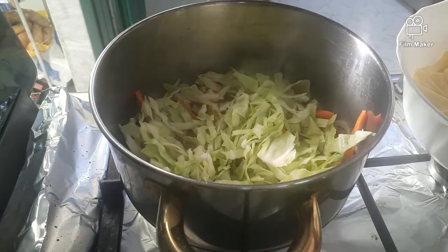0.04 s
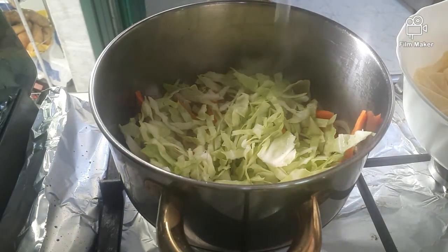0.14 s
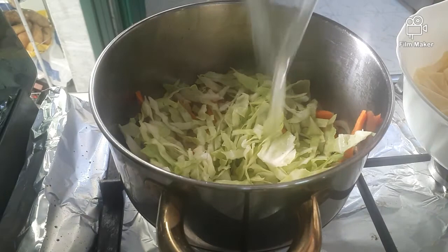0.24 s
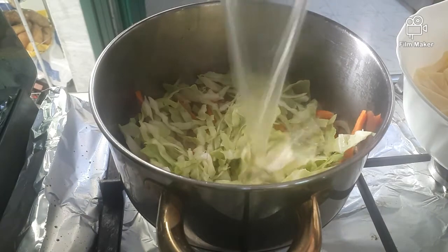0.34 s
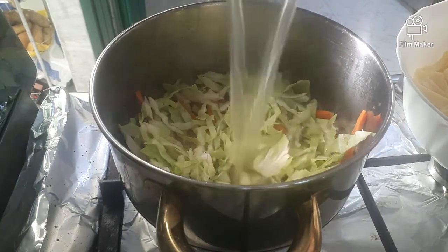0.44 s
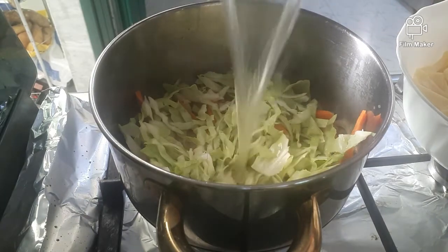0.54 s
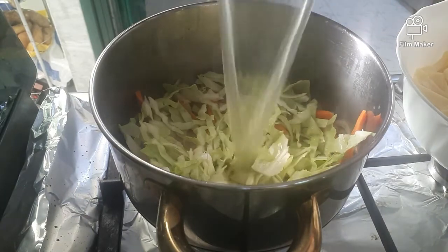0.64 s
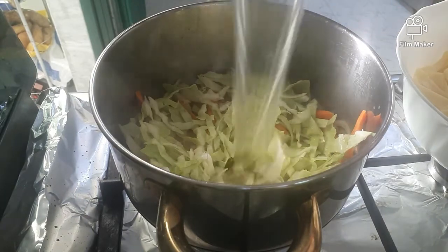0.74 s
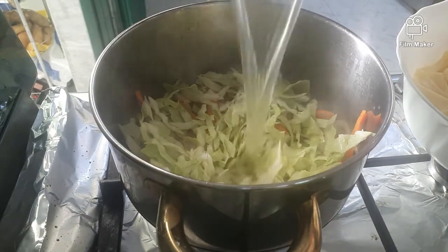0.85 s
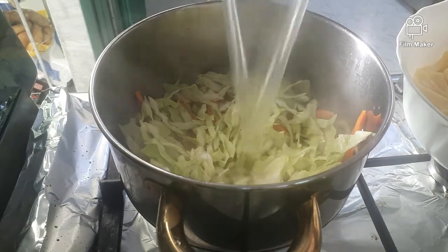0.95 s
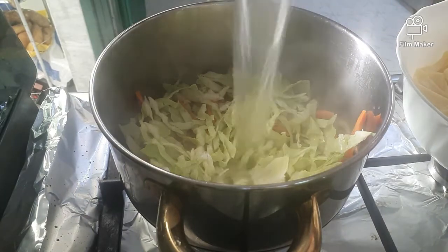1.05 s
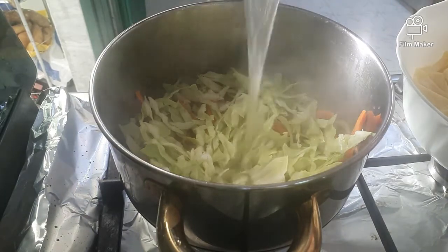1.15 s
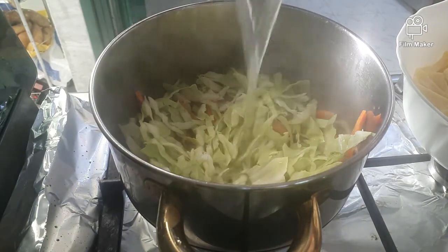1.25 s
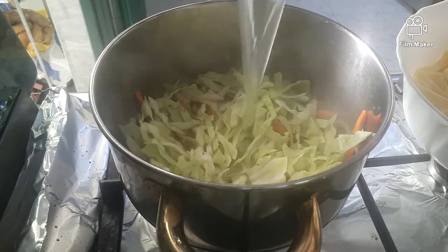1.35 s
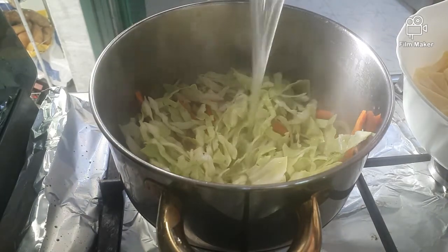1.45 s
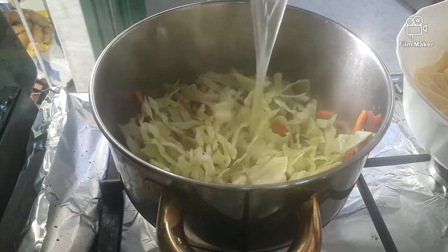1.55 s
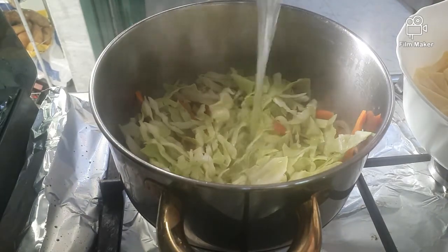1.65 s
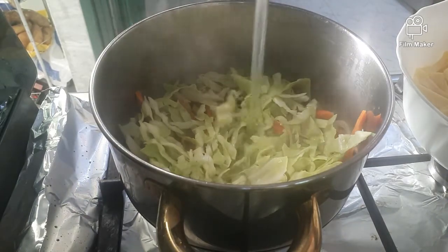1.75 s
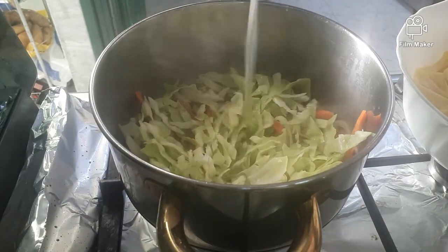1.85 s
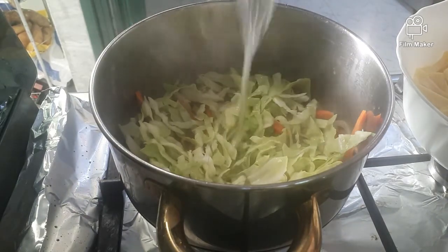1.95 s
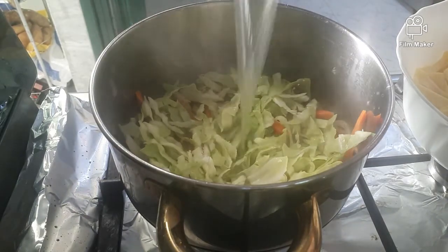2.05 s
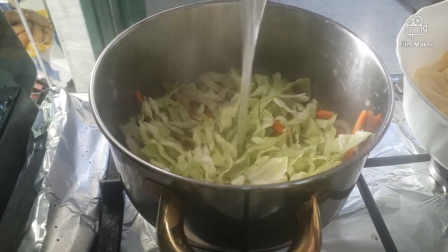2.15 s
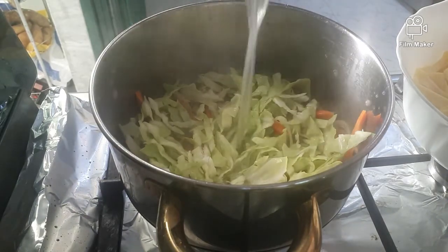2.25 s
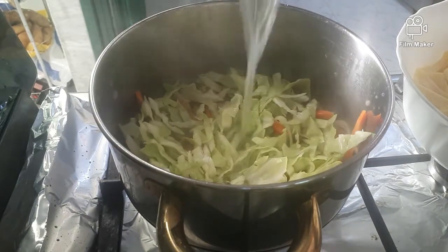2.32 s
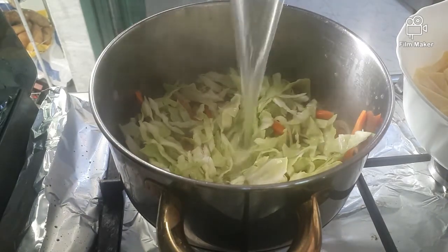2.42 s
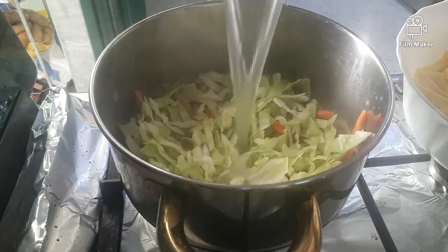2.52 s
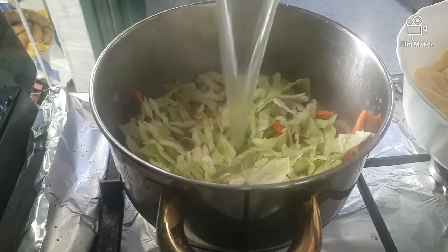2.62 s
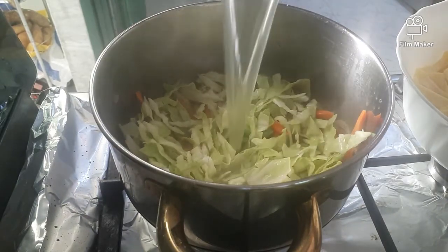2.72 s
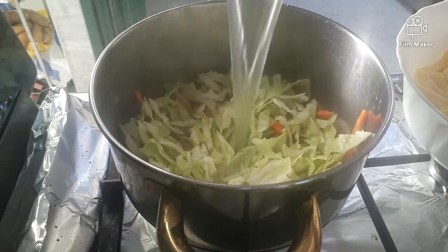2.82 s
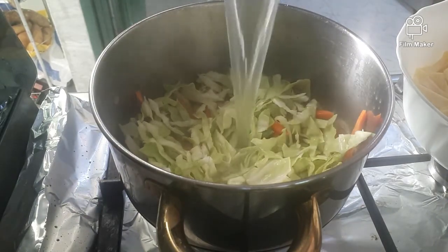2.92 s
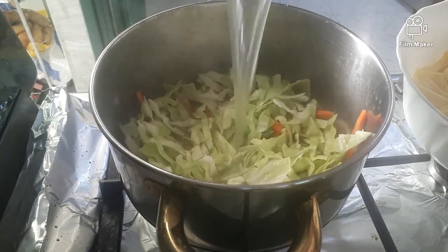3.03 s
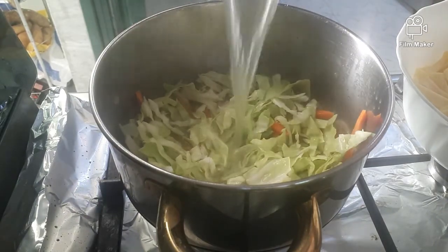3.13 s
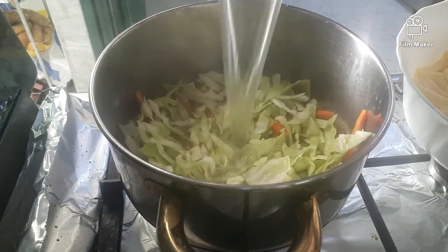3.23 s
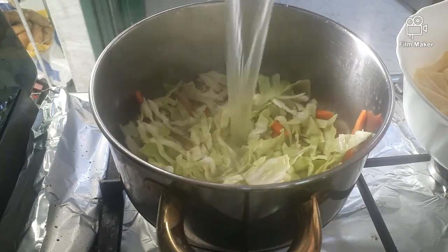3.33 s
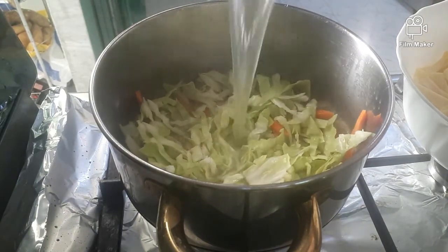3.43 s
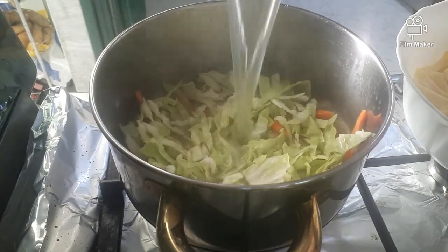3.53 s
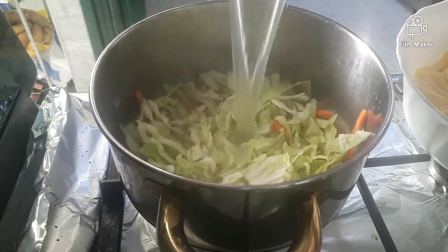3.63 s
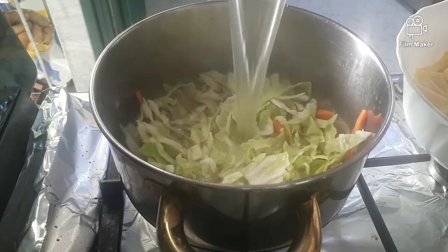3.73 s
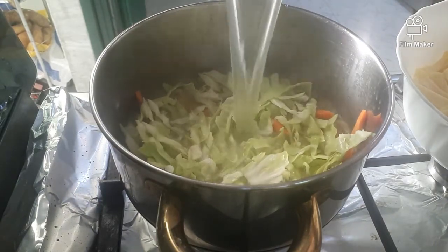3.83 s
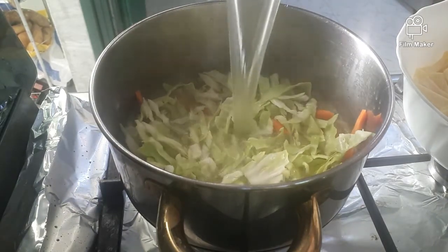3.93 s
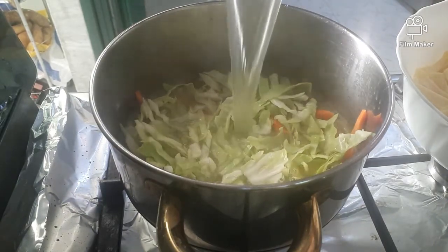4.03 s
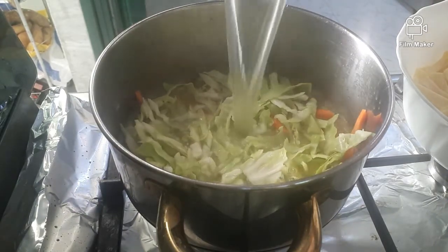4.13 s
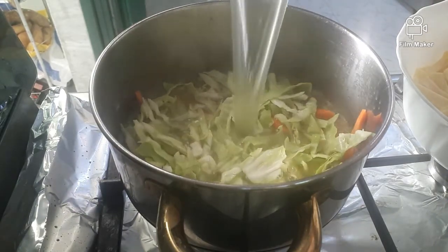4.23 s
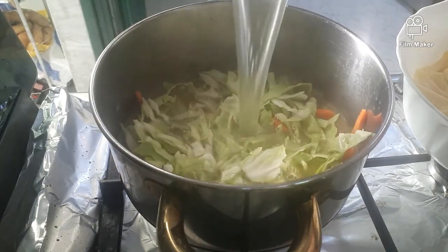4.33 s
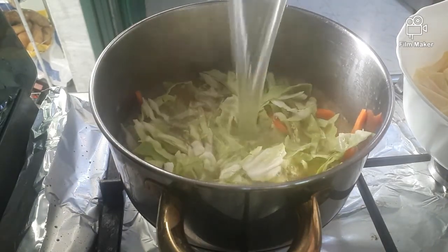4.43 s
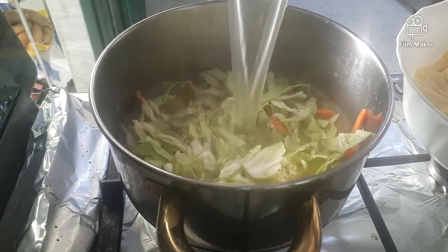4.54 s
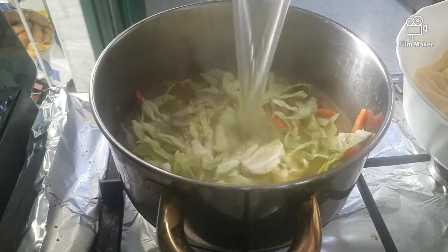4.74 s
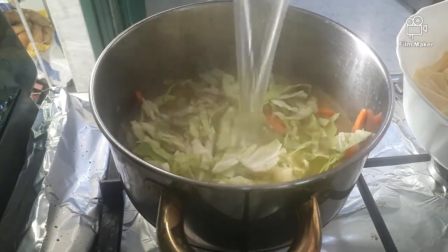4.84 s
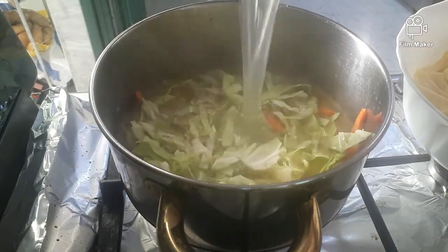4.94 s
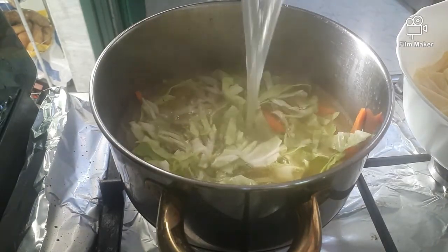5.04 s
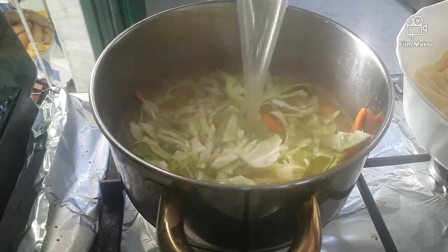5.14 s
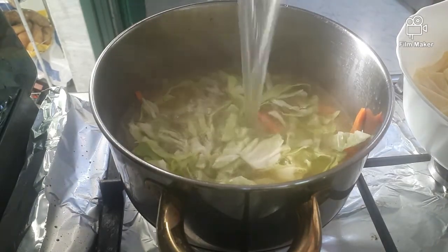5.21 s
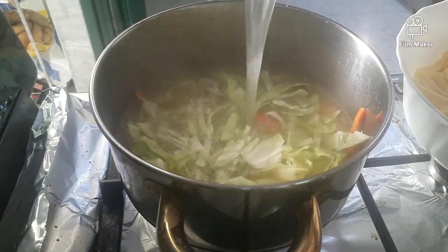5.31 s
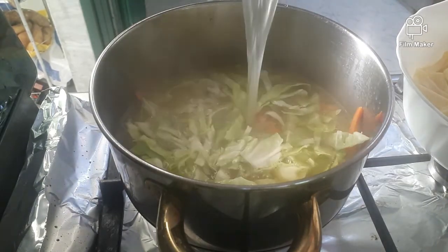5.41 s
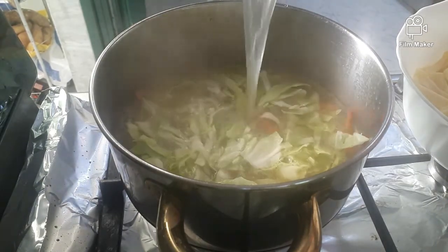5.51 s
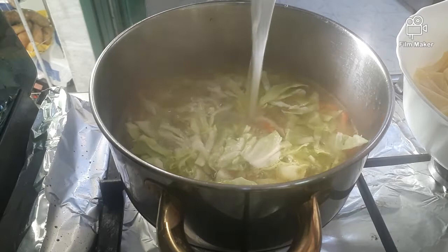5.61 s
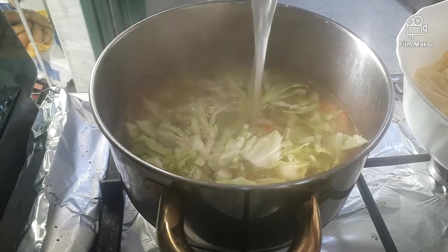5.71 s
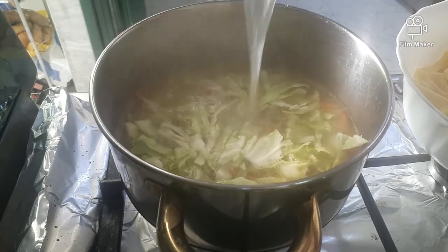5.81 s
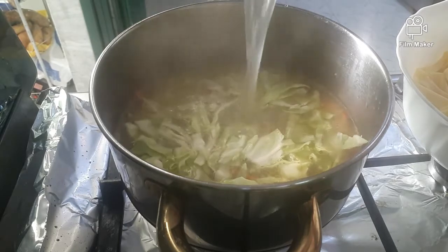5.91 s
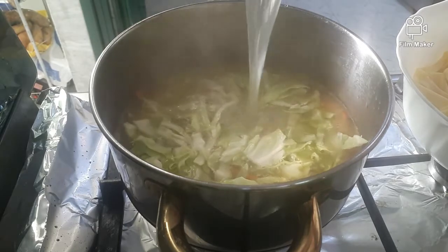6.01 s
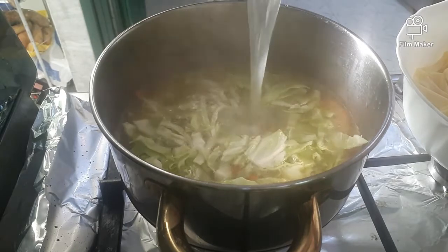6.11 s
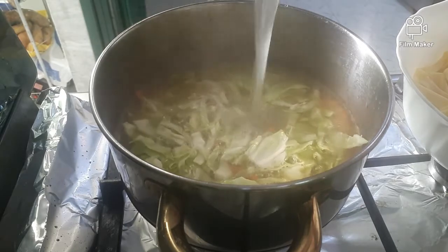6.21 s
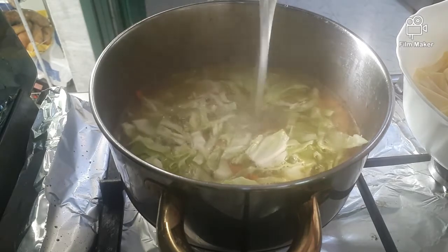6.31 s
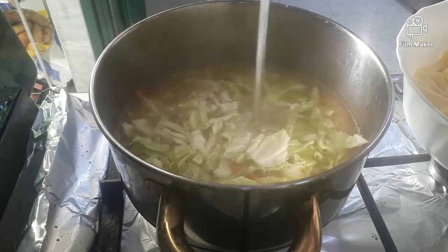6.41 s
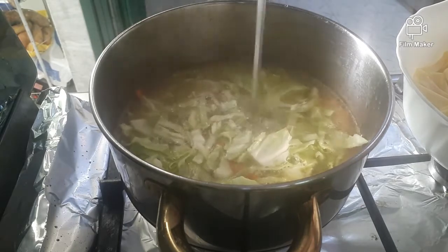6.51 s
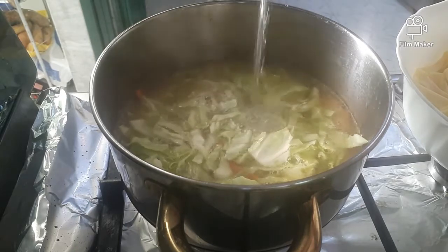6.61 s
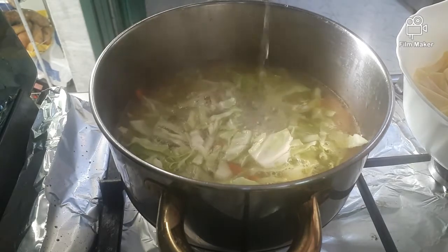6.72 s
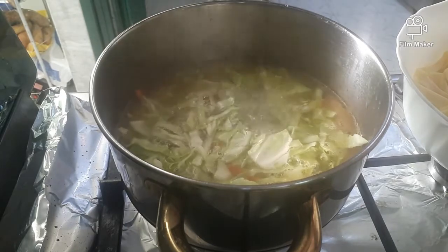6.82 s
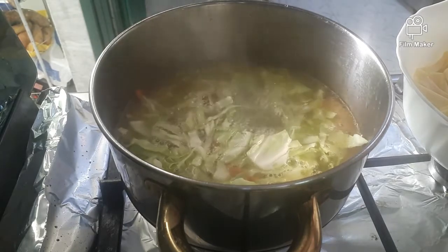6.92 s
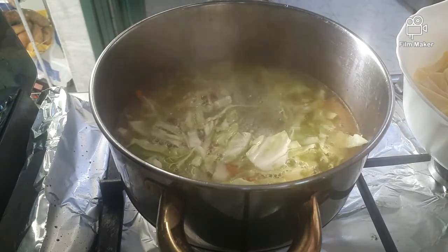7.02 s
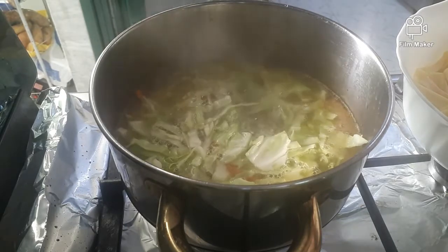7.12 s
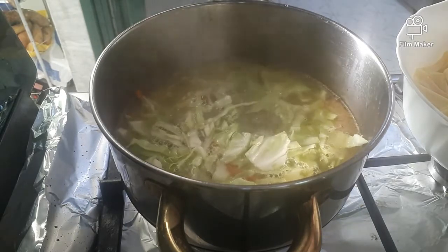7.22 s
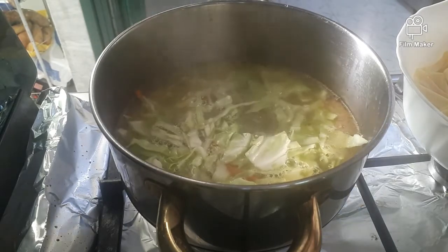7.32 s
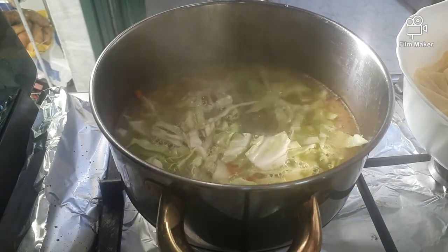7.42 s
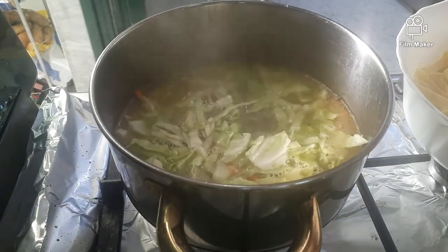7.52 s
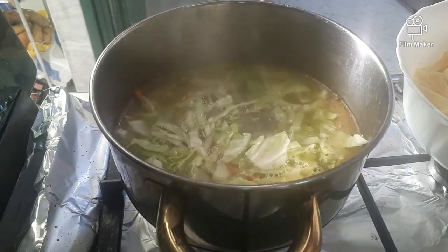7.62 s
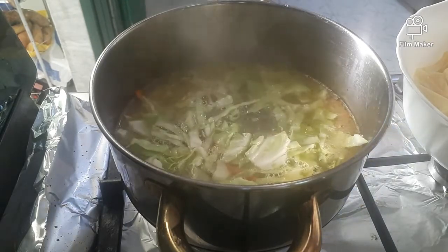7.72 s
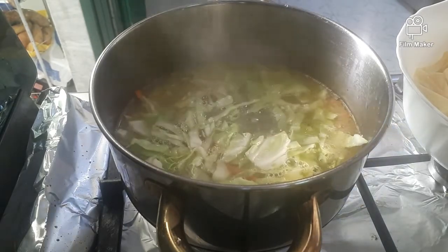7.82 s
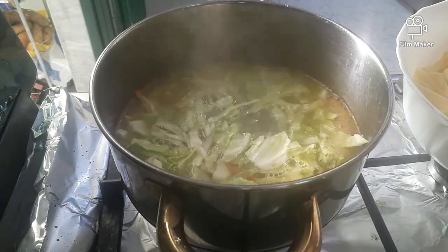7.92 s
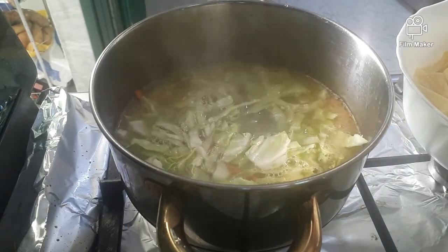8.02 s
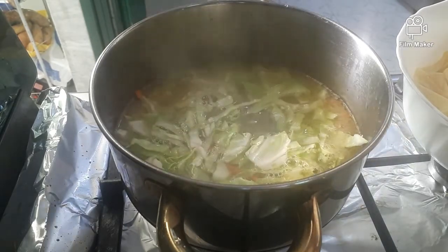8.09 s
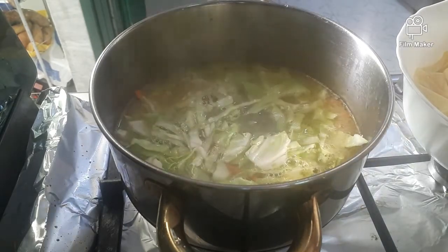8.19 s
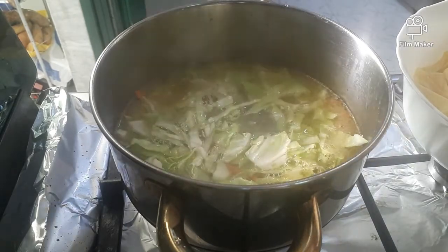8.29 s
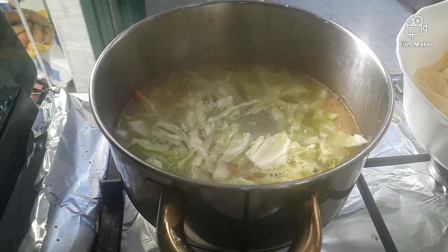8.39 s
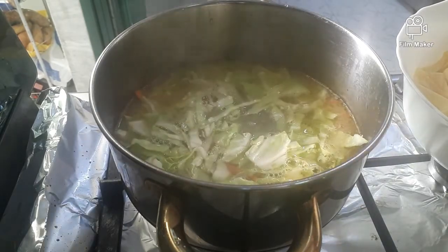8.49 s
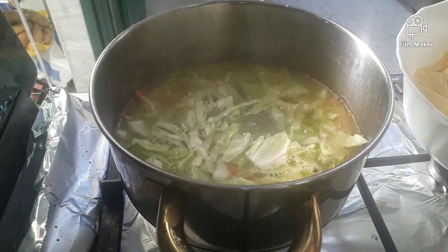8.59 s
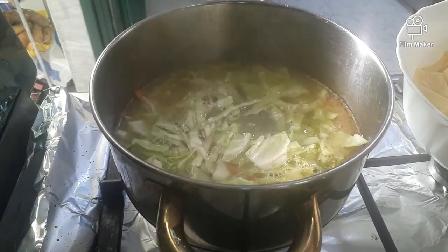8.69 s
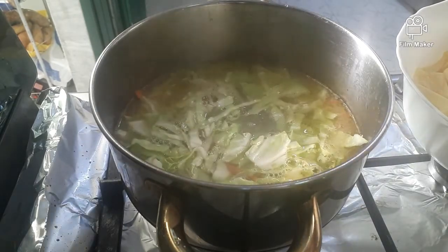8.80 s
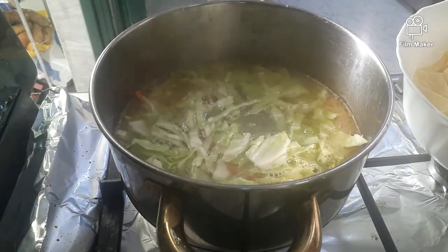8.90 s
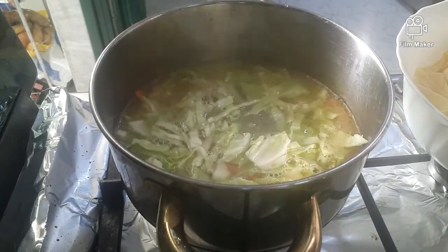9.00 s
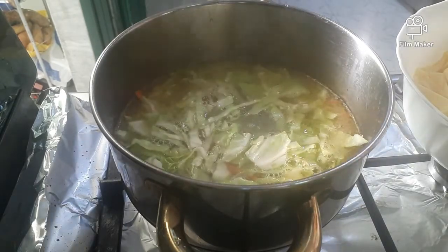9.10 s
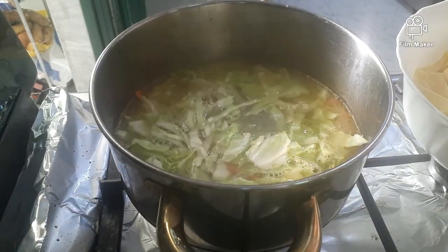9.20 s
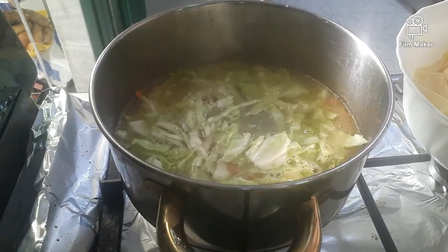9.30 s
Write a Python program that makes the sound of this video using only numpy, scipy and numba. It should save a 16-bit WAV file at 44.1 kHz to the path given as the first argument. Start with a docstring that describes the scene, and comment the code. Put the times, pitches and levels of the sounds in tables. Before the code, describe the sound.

Broth pours into a hot steel pot of vegetables with loud bursting sizzle and splashing, then thins, stops and fades to soft burner roar.

```python
"""A gas burner roars softly under a hot steel pot of vegetables, with a few early spits and plops: filtered noise.
Broth is then poured in: sizzle is bursting noise with tiny chirps, splash and gurgle are patter and lumpy noise.
As the pot fills, resonators excited by sizzle and splash climb in pitch: the ringing air above the broth.
Mid-pour the sound drops out for a quarter of a second; then the stream thins and stops, and the sizzle fades.
Everything is heard close up through a small two-port microphone in a kitchen."""
import sys
import numpy as np
from scipy import signal
from scipy.fft import rfft, irfft
from scipy.io import wavfile
from scipy.ndimage import uniform_filter1d
from numba import njit

SR = 44100
rng = np.random.default_rng(int(sys.argv[2]) if len(sys.argv) > 2 else 0)


def natural_amplitude(level_db):
    """Convert a level in decibels to a linear amplitude factor, elementwise."""
    exponent = np.asarray(level_db, float) / 20
    return 10 ** exponent


def bounce(signal):
    """Save signal as a 16-bit WAV file at the path given by the first command-line argument."""
    frames = np.transpose(np.atleast_2d(signal))
    limited = np.clip(frames, -1, 1)
    pcm = np.round(limited * 32767).astype(np.int16)
    wavfile.write(sys.argv[1], SR, pcm)


N = 412335  # samples
STREAM_S = (0.43, 6.9)  # the stream lands and stops


def read_table(table, hz):
    """Interpolation on a logarithmic frequency axis, near the ear's own scale."""
    table_hz, value = np.transpose(table)
    return np.interp(np.log(hz + 1), np.log(table_hz + 1), value)


def colour(x, spectrum):
    """Spectral shaping: each row is filtered by a (frequency [Hz], level [dB]) table, then set to rms 1."""
    gain = natural_amplitude(read_table(spectrum, np.fft.rfftfreq(N, 1 / SR)))
    y = irfft(rfft(x) * gain, N)
    return y / np.sqrt(np.mean(y ** 2))


def delay(spectrum, lag_s):
    """Pure delay: a phase lag proportional to frequency."""
    return spectrum * np.exp(-2j * np.pi * np.fft.rfftfreq(N, 1 / SR) * lag_s)


def noise():
    """White noise: equal power at all frequencies, independent in two rows."""
    return rng.standard_normal((2, N))


@njit
def resonator(x, hz, width):
    """Simple resonance: a state-variable band-pass with a moving centre and unit gain there."""
    y, band, low = np.empty(len(x)), 0., 0.
    for i in range(len(x)):
        g, damping = np.tan(np.pi * hz[i] / SR), width / hz[i]
        v = (band + g * (x[i] - low)) / (1 + g * (g + damping))
        band, low = 2 * v - band, low + 2 * g * v
        y[i] = damping * v
    return y


@njit
def chirps(at, hz, cycles, size, glide, count):
    """Bubble resonance: damped sines that rise in pitch as they die."""
    y = np.zeros(count)
    for k in range(len(at)):
        life = cycles[k] * SR / hz[k]  # samples to fall to 1/e
        phase = 0.
        for i in range(min(int(4 * life), count - at[k])):
            phase += 2 * np.pi * hz[k] * (1 + glide * i / life) / SR
            y[at[k] + i] += size[k] * np.exp(-i / life) * np.sin(phase)
    return y


def random_chirps(count, low_hz, hz_ratio, cycles, more_cycles, spread_db, glide):
    """Bubble statistics: chirps at random times, pitches, lives and sizes, independent in two rows."""
    rows = []
    for when, pitch, life, size in rng.random((2, count, 4)).transpose(0, 2, 1):
        hz = low_hz * hz_ratio ** pitch
        rows.append(chirps((when * N).astype(int), hz, cycles + more_cycles * life, natural_amplitude(spread_db * size), glide, N))
    return np.array(rows) / np.std(rows)


def walk(rate):
    """Slow random modulation: levels held 1 / rate s and smoothed twice; spread near 1."""
    hold = int(SR / rate)
    steps = np.repeat(rng.standard_normal(N // hold + 1), hold)
    return 0.75 * uniform_filter1d(uniform_filter1d(steps, hold), hold)[:N]


def puffs(rate, spread_db, tail_s, steady):
    """Shot noise: random bursts of uneven size die away exponentially over a steady part; rms 1."""
    sizes = natural_amplitude(spread_db * np.minimum(rng.exponential(size=N), 3.0))
    kicks = (rng.random(N) < rate / SR) * sizes
    bursts = signal.lfilter([1], [1, -np.exp(-1 / (tail_s * SR))], kicks)
    shape = steady + bursts / np.sqrt(np.mean(bursts ** 2))
    return shape / np.sqrt(np.mean(shape ** 2))


def ramp(start_s, stop_s):
    """Linear onset: 0 before, 1 after, straight in between."""
    return np.clip((np.arange(N) / SR - start_s) / (stop_s - start_s), 0, 1)


# The stream lands, slackens, surges again, thins out and stops; the steel cools under the broth.
# (time [s], sizzle level before mixing [dB], splash level before mixing [dB])
POUR_LEVELS = [(0, -34.5, -44.5), (.41, -35, -43), (.48, -24.5, -37), (.58, -24.5, -31.5), (.75, -26, -32),
               (.95, -24.5, -29.5), (1.2, -23.5, -32), (1.5, -27.5, -34.5), (2.2, -28.5, -35),
               (2.42, -22.5, -30), (3.2, -22, -31), (3.72, -26, -30.5), (3.95, -26, -32),
               (4.45, -26.5, -35.5), (4.71, -27, -35.5), (4.9, -31.5, -37.5), (5.18, -29, -39),
               (5.33, -32, -38.5), (5.53, -28, -39), (5.8, -33, -40), (6.05, -35, -42.5),
               (6.3, -32.5, -39.5), (6.5, -34, -41.5), (6.8, -38.5, -42), (6.92, -44, -49),
               (7.25, -51, -52), (7.6, -55, -55.5), (7.85, -57, -54.5), (8.5, -59.5, -58),
               (9.35, -61, -62.5)]


def pour_levels():
    """Time envelope: sizzle and splash levels follow the strength of the stream."""
    s, *columns = np.transpose(POUR_LEVELS)
    return [np.interp(np.arange(N) / SR, s, column) for column in columns]


# Spectrum of the sizzle, heard with the treble stepping down just above 8 kHz: (frequency [Hz], relative
# density [dB per Hz])
SIZZLE_SPECTRUM = [(500, -43.5), (1500, -11.5), (2500, -2), (3500, -0.5), (4500, 0.5), (6000, 0), (8000, 0),
                   (8800, -6), (9500, -4), (12500, 0), (14500, -3), (16000, -4)]


def sizzle(db, top_db, count):
    """Flash boiling: droplets burst to steam on hot steel in fine ticks and larger spatters; top treble varies."""
    ticks = puffs(rate=1200, spread_db=0.5, tail_s=0.00049, steady=4.4)
    spatters = puffs(rate=48, spread_db=1.5, tail_s=0.0058, steady=8.1)
    flutter = natural_amplitude(0.95 * walk(22) + 0.69 * walk(9))
    steam = colour(noise() * ticks * spatters * flutter, SIZZLE_SPECTRUM)
    top = signal.sosfilt(signal.butter(4, 8500, "high", fs=SR, output="sos"), steam)
    top_change = natural_amplitude(top_db + 0.99 * walk(11)) - 1
    # tiny steam bubbles pop with a brief pitch of their own
    fizz = random_chirps(count, 2800, 4.0, cycles=4.9, more_cycles=10.0, spread_db=18.0, glide=.02)
    return natural_amplitude(db) * (0.2 * fizz + steam + top_change * top)


# Spectrum of the patter: (frequency [Hz], relative density [dB per Hz])
SPLASH_SPECTRUM = [(300, -39.5), (600, -11), (1000, -4), (1600, -3), (2300, -9), (3500, -15.5), (6000, -48)]


def splash(db, count):
    """Impact and air entrainment: the stream slaps leaves and broth and drags bubbles under, which blip upward."""
    slaps = puffs(rate=370, spread_db=5.0, tail_s=.003, steady=3.0)
    patter = colour(noise() * slaps, SPLASH_SPECTRUM)
    blips = random_chirps(count, 600, 6.67, cycles=2.0, more_cycles=2.7, spread_db=21.0, glide=0.023)
    return natural_amplitude(db) * (0.6 * patter + 0.18 * blips)


# Spectrum of the churning stream: (frequency [Hz], relative density [dB per Hz])
GURGLE_SPECTRUM = [(29, -58), (50, -34), (140, -8), (210, -7.5), (237, 1.5), (274, -4.5), (369, -1),
                   (486, -6.5), (568, -6), (700, -6), (910, -6), (1540, -120)]


def gurgle(gain):
    """Turbulence: the stream churns among the leaves as low lumpy noise."""
    churn = puffs(rate=110, spread_db=-2.0, tail_s=0.015, steady=3.0)
    return gain * colour(noise() * churn, GURGLE_SPECTRUM)


# Modes of the air in the pot, before waver and mixing: (frequency empty [Hz], frequency full [Hz], width [Hz],
# level empty [dB], level half full [dB], level full [dB], left minus right [dB], likeness of the ports [0-1])
AIR_MODES = [(713, 772, 58.5, 8, 11, 12.5, 4.5, 0.94), (1194, 1393, 119, 11.5, 12.5, 8.5, 0.5, 0.7),
             (1820, 2050, 178, 7, 9, 7.5, 1, 0.4), (2103, 2220, 66, -2, 2, 6, 13.5, 0.5),
             (2547, 2700, 49, -3, 14, 15.5, 1.5, 0.7), (3070, 3170, 250, 1.5, 1.5, 5.5, 2.5, 0),
             (3890, 3990, 200, 0.5, 1.5, 2.5, -7.5, 0.1), (4460, 4600, 67, -2.5, 3, -1, -10, 0.4),
             (4840, 5300, 370, -14.5, -1.5, -3, -8, 0.7), (7570, 7780, 1700, 3, 2, 1.5, 7, 0)]


def pot(x, lowest_db):
    """Cavity resonance: air modes climb as the space shrinks, each reaching the ports in its own balance."""
    fill = ramp(*STREAM_S) ** 0.7  # depth against share of the pouring time
    out = np.zeros((2, N))
    for k, (empty_hz, full_hz, width, *fill_db, pan_db, alike) in enumerate(AIR_MODES):
        # the heaving surface and the steam make each mode waver
        hz = (empty_hz + (full_hz - empty_hz) * fill) * (1 + .006 * walk(4))
        db = np.interp(fill, (0, .5, 1), fill_db) + 1.3 * walk(5)
        if k == 0:
            db = db + lowest_db
        mid, side = (resonator(row, hz, float(width)) for row in x)
        mid_share, side_share = np.sqrt((1 + np.clip(alike, 0, 1) * np.array([1, -1])) / 2)
        both = np.array([mid_share * mid + side_share * side, mid_share * mid - side_share * side])
        out += natural_amplitude(db + np.array([[pan_db], [-pan_db]]) / 2) * both
    out[0] = irfft(delay(rfft(out[0]), lag_s=.0001), N)  # left a little late
    return out


# Single spits of steam and fat: (time [s], nominal level before panning [dB], centre frequency [Hz])
SPIT_EVENTS = [(.1206, -18, 3500), (.247, -26, 4500), (.279, -25, 5500), (.2957, -17, 7000),
               (.616, -9, 11000), (.7751, -13, 8000), (1.1662, -9, 3500), (1.198, -14, 3500),
               (1.9155, -13, 3000), (2.1859, -14, 3300), (2.502, -10, 6000), (4.7533, -13, 8000),
               (5.1818, -16, 4500), (5.5619, -13, 11000), (5.6273, -13, 7000), (5.6637, -16, 7700),
               (6.0797, -22, 3500), (6.3222, -14, 4500), (6.4689, -23, 7800), (6.5058, -23, 5000),
               (6.739, -26, 3500), (6.7956, -25, 4500), (6.802, -24, 6000), (7.0356, -32, 3600)]


def spits():
    """Transient radiation: each spit is a few ms of band-passed noise, partly alike at the two ports."""
    rise_s, fade_s, relative_width, pan_db = .001, .0018, 1.9, -1.5  # width over centre; left minus right
    out, t = np.zeros((2, N)), np.arange(1024) / SR
    shape = (1 - np.exp(-t / rise_s)) * np.exp(-t / fade_s)
    shape /= shape.max()
    cracks = rng.standard_normal((len(SPIT_EVENTS), 2, len(t)))
    for (s, db, hz), rows in zip(SPIT_EVENTS, cracks):
        centre, width = np.full(len(t), float(hz)), relative_width * hz
        mid, side = (resonator(resonator(row, centre, width), centre, width) for row in rows)
        both = np.array([mid + 0.7 * side, mid - 0.7 * side]) / (2 * np.std(mid))
        i = int(s * SR)
        out[:, i:i + len(t)] += natural_amplitude(db) * shape * both
    return out * natural_amplitude(np.array([[pan_db], [-pan_db]]) / 2)


# Drops that trap a bubble and plop: (time [s], starting amplitude [dB], starting frequency [Hz])
PLOP_EVENTS = [(.074, -28, 1980), (.226, -30, 2010), (.977, -13, 1320), (1.166, -16, 754),
               (1.595, -17, 1280), (1.915, -18, 1310), (2.187, -18, 1300), (2.502, -12, 2030),
               (6.322, -21, 1580), (6.739, -21, 840), (6.764, -26, 1000), (6.786, -29, 1000)]


def plops():
    """Bubble resonance: each trapped bubble rings for a few cycles, rising slightly."""
    s, db, hz = np.transpose(PLOP_EVENTS)
    cycles = np.full(len(s), 2.6)
    return chirps((s * SR).astype(int), hz, cycles, natural_amplitude(db), .025, N)


# Spectrum of flame and kitchen air: (frequency [Hz], relative density [dB per Hz])
BURNER_SPECTRUM = [(26, -31.5), (45, -14.5), (69, -6), (118, -4.5), (179, -3), (242, -2.5), (267, -10),
                   (343, -7.5), (462, -33), (511, -9), (1030, -11.5), (1120, -8.5), (2400, -22.5),
                   (2700, -19), (3500, -40), (5280, -120)]


def burner():
    """Combustion roar: gas flame and kitchen air as smooth, slowly wavering noise."""
    level_db = -48.5 + 1.0 * walk(2.6)
    return natural_amplitude(level_db) * colour(noise(), BURNER_SPECTRUM)


# Likeness of the two ports: (frequency [Hz], likeness [0-1])
PORT_LIKENESS = [(60, .92), (130, 0.99), (290, 1), (640, 0.73), (1400, 0.6), (2200, 0), (3100, 0),
                 (5000, 0.31), (8000, 0.1), (15000, 0.34)]
# Balance of the two ports: (frequency [Hz], left minus right [dB])
PORT_BALANCE = [(60, -1.5), (110, -0.5), (200, 1.5), (380, -3), (700, 6), (1290, 1), (2380, -1), (4400, 4),
                (8120, 0.5), (15000, -4.5)]


def ports(x):
    """Spatial coherence: two unrelated signals become alike in the bass and unrelated higher up, left a little late."""
    hz = np.fft.rfftfreq(N, 1 / SR)
    alike = np.clip(read_table(PORT_LIKENESS, hz), 0, 1)
    mid, side = rfft(x) * np.sqrt([(1 + alike) / 2, (1 - alike) / 2])
    balance = natural_amplitude(read_table(PORT_BALANCE, hz) / 2)
    left = delay((mid + side) * balance, lag_s=0.0002)
    right = (mid - side) / balance
    return irfft([left, right], N)


def scene():
    """Superposition: pot sounds heard directly and through the pot's air, over the burner."""
    sizzle_db, splash_db = pour_levels()
    lands, stops = (ramp(s - .05, s + .05) for s in STREAM_S)
    # churn follows the splash over a quiet simmer that is always there
    churn = np.hypot(lands * natural_amplitude(splash_db - 10), natural_amplitude(-62))
    # drive of the lowest air mode [dB]: dry pot, stream running, broth at rest
    lowest_db = np.interp(lands + stops, (0, 1, 2), (-16, 2, 4.5))
    inside = sizzle(sizzle_db, top_db=1.5, count=3000) + splash(splash_db, count=4000)
    direct = ports(natural_amplitude(2.5) * inside + natural_amplitude(2.5) * gurgle(churn) + burner())
    near = direct + natural_amplitude(-2.0) * pot(inside, lowest_db)
    pan_db = np.linspace(-0.6, 0, N)  # left minus right, from start to end
    return near * natural_amplitude(np.array([pan_db, -pan_db]) / 2) + spits() + plops()


def low_pass(x):
    """Removes everything above the highest recorded frequency."""
    return signal.sosfilt(signal.butter(12, 16850, fs=SR, output="sos"), x)


def record(dry):
    """Band limiting: the microphone drops the deep bass, the top is cut, and the sound drops out briefly."""
    t = np.arange(N) / SR
    live = (t < 4.4632) | (t > 4.6952)
    bass_cut = signal.butter(3, 57, "high", fs=SR, output="sos")
    top_cut = signal.ellip(10, .2, 60, 15800, fs=SR, output="sos")
    mix = signal.sosfilt(top_cut, signal.sosfilt(bass_cut, dry) * live)
    return low_pass(mix)


dry = scene()
out = record(dry)
bounce(out)
```